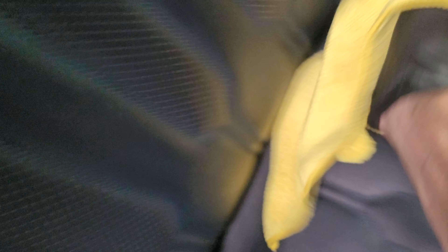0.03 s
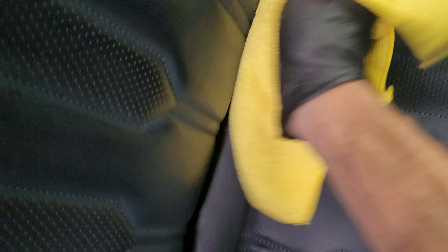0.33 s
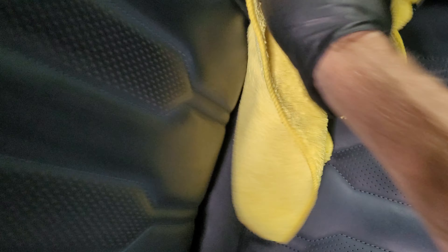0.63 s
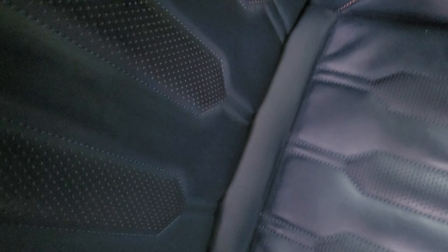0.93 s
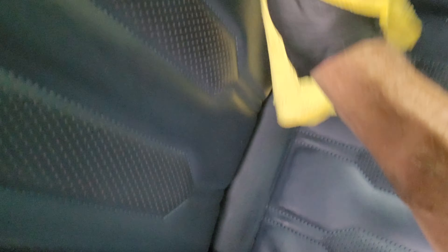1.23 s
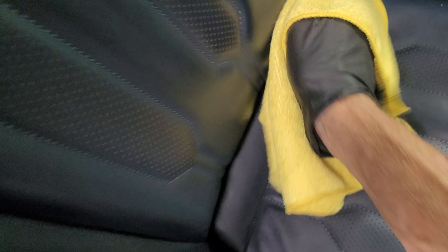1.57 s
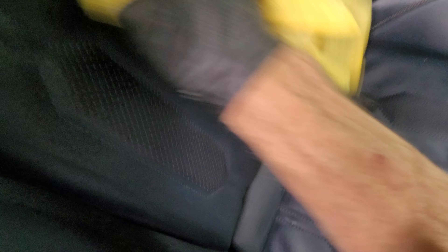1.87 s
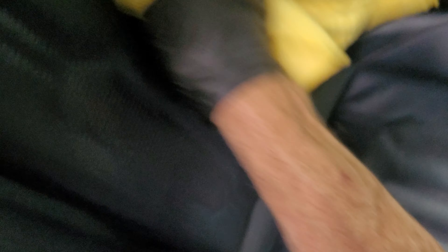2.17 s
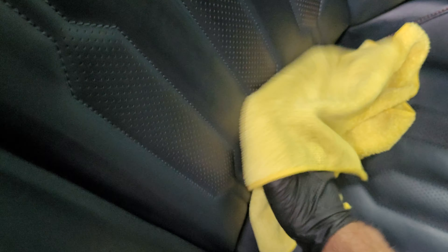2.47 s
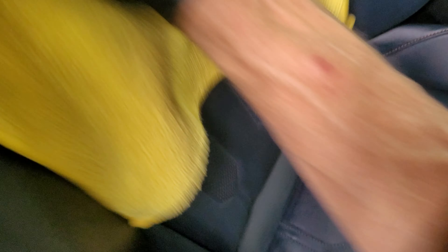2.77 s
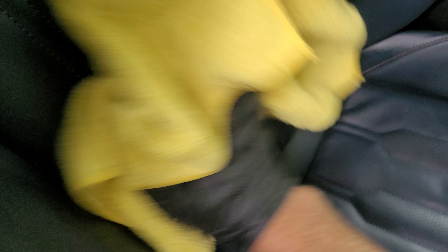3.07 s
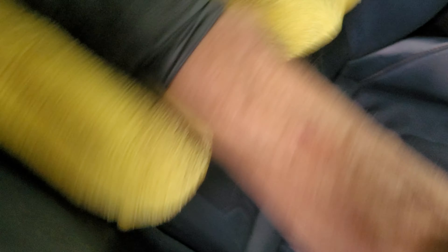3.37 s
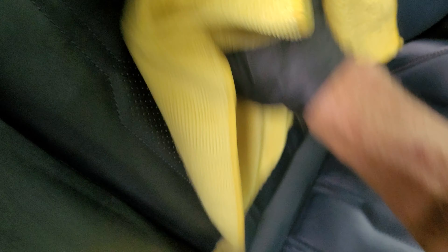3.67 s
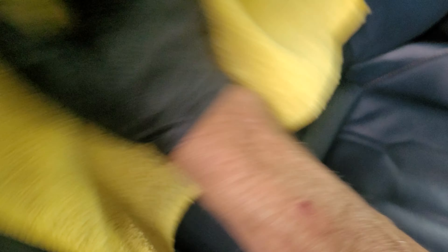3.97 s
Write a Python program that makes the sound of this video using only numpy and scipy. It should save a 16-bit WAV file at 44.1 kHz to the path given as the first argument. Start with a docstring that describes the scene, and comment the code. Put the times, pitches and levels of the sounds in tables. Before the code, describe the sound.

A cloth swishes back and forth over a leather car seat, close up, starting with faint squeaks and a soft thud at 0.3 seconds. Folds flap, clearly at 1.3 seconds. From 2 seconds the hissing strokes come with more dull cushion thuds and low juddering. The cloth snaps twice near 3 seconds, and rubbing continues to a strong flap at 3.9. A faint cabin rush lies beneath.

```python
"""A cloth is wiped back and forth over a leather car seat, close to the microphone.
Stick-slip friction of its fibres makes each stroke hiss, at times narrowing to a squeak or sizzle;
under pressure, coarser slips make the leather judder. The hand thuds into the damped cushion, folds
of cloth flap and twice snap, and the small cabin reflects the flaps and snaps briefly. Late on, the
air under the arm resonates. A faint steady rush lies beneath it all."""
import sys
import numpy as np
from scipy import signal
from scipy.fft import rfft, irfft
from scipy.io import wavfile

SR = 44100
rng = np.random.default_rng(int(sys.argv[2]) if len(sys.argv) > 2 else 0)


def generate_wav(signal):
    """Clip the signal to [-1, 1] and save it as 16-bit WAV at the path in sys.argv[1]."""
    frames = np.transpose(np.atleast_2d(signal))
    scaled = np.clip(frames, -1, 1) * 32767
    pcm = np.round(scaled).astype(np.int16)
    wavfile.write(sys.argv[1], SR, pcm)


N = 176400

def amp(db):
    return 10 ** (np.asarray(db) / 20)

def unit_rms(x):
    return x / np.sqrt(np.mean(x ** 2) + 1e-20)

def per_bin(points):
    """Interpolates a spectrum over log frequency at every bin."""
    hz, value = np.transpose(points)
    return np.interp(np.log(np.fft.rfftfreq(N, 1 / SR) + 1), np.log(hz), value)

def colour(x, spectrum):
    """Spectral shaping, scaled to rms 1."""
    return unit_rms(irfft(rfft(x) * amp(per_bin(spectrum)), N))

def pan(balance_db):
    """Constant-power panning; balance is the left level minus the right."""
    gains = amp(np.array([balance_db, -balance_db]).reshape(2, -1) / 2)
    return gains / np.sqrt(np.mean(gains ** 2, 0))

def add(mix, start_s, sound):
    part = mix[..., max(round(start_s * SR), 0):][..., :sound.shape[-1]]
    part += sound[..., :part.shape[-1]]

def wander(cutoff_hz):
    """Low-pass Gaussian noise of rms 1."""
    rolloff = 1 + (np.fft.rfftfreq(N, 1 / SR) / cutoff_hz) ** 4
    return unit_rms(irfft(rfft(rng.standard_normal(N)) / rolloff, N))

def slip_noise(per_s, spread_db, share):
    """Shot noise in two channels: random slips carry a share of the power, Gaussian noise the rest."""
    sizes = amp(spread_db * np.minimum(rng.exponential(1, N), 4))
    occurs = rng.random(N) < per_s / SR
    slips = unit_rms(sizes * occurs * rng.standard_normal((2, N)))
    return np.sqrt(share) * slips + np.sqrt(1 - share) * rng.standard_normal((2, N))

def mid_side(x, side_db):
    """Mid-side mixing makes two independent signals a partly coherent pair."""
    return unit_rms(x[0] + amp(side_db) * np.array([x[1], -x[1]]))

def cabin_echo(x, wet_db, t60_s, side_db):
    """Reverberation: reflections decay exponentially in the padded interior."""
    t = np.arange(SR // 4) / SR
    tail = mid_side(rng.standard_normal((2, len(t))), side_db) * amp(-60 * t / t60_s) * (t > .003)
    wet = signal.fftconvolve(np.atleast_2d(x), tail / np.linalg.norm(tail[0]), axes=1)
    return x + amp(wet_db) * wet[:, :N]

# Spectrum of the cabin's rush: frequency_hz, gain_db
CABIN_SPECTRUM = [(20, -9), (45, 6), (100, -1.5), (300, 3.5), (600, -8.5), (1400, -19.5), (3500, -22.5),
                  (15000, -42)]
def cabin_rush():
    """Stationary noise, strongest in the bass, fills the parked car."""
    return amp(-58) * colour(mid_side(rng.standard_normal((2, N)), side_db=-10), CABIN_SPECTRUM)

# Air resonances under the arm: centre_hz, half_width_hz, level_db, balance_db
CAVITY_MODES = [(630, 160, -54, -7.5), (1766, 190, -59, 4), (4345, 380, -62, 0)]
def arm_cavity(start_s=2.905, rise_s=0.028, fade_db_per_s=7.5):
    """Cavity resonance: rubbing excites the air in the gap between arm and seat."""
    out, t = 0, np.arange(N) / SR - start_s
    for hz, width_hz, db, balance_db in CAVITY_MODES:
        band = (wander(width_hz) + 1j * wander(width_hz)) * np.exp(2j * np.pi * hz * t)
        out = out + amp(db) * pan(balance_db) * band.real
    return out * np.clip(t / rise_s, 0, 1) * amp(-fade_db_per_s * t)

# Modes struck by a snap: frequency_hz, gain_db, t60_s, balance_db
SNAP_RING = [(377, 6, 0.01, 2.5), (612, 2, 0.022, -18), (1030, -1, 0.0055, 7), (1460, -8, 0.011, 1)]
# The cloth pulled taut: start_s, gain_db, cutoff_hz
CLOTH_SNAPS = [(2.8994, -26, 720), (2.988, -19, 1930)]
def snaps(rise_s=0.00021):
    """Impact excitation: taut cloth knocks the seat into damped modes; padding absorbs the treble."""
    out, t = np.zeros((2, N)), np.arange(SR // 10) / SR
    ring = sum(pan(balance_db) * amp(db - 60 * t / t60_s) * np.sin(2 * np.pi * hz * t)
               for hz, db, t60_s, balance_db in SNAP_RING)
    for start_s, db, cutoff_hz in CLOTH_SNAPS:
        padding = signal.butter(5, cutoff_hz, fs=SR, output="sos")
        add(out, start_s, amp(db) * signal.sosfilt(padding, ring * np.minimum(t / rise_s, 1)))
    return cabin_echo(out, wet_db=-13, t60_s=0.22, side_db=-2)

# Folds landing on the seat: time_s, peak_db, pitch_hz
FOLD_FLAPS = [(0.188, -38, 162), (0.227, -37.5, 262), (0.298, -31, 142), (0.971, -34, 330),
              (1.007, -36, 231), (1.131, -33.5, 226), (1.245, -33, 556), (1.32, -22, 246),
              (1.337, -32.5, 277), (1.348, -30, 173), (1.769, -33.5, 136), (1.889, -28.5, 310),
              (2.019, -28.5, 205), (2.199, -30.5, 135), (2.321, -30.5, 377), (2.363, -28.5, 370),
              (2.428, -21.5, 220), (2.454, -26, 200), (2.664, -31, 370), (2.727, -33, 314),
              (2.783, -26.5, 202), (3.488, -29, 258), (3.528, -29, 320), (3.735, -33, 410),
              (3.799, -32.5, 265), (3.9334, -19, 274)]
def flaps(decay_cycles=0.69):
    """Air displaced by each fold radiates one pulse, and the leather swings for a cycle or two."""
    out, t = np.zeros(N), np.arange(-SR // 50, SR // 20) / SR
    for time_s, db, hz in FOLD_FLAPS:
        u = np.pi * hz * t
        puff = (1 - 3 * u ** 2 + u) / (1 + u ** 2) ** 3  # the odd term skews the pulse
        swing = np.cos(2 * u) * np.exp(-np.where(t < 0, u ** 2, hz * t / decay_cycles))
        add(out, time_s + t[0], amp(db) * (puff + swing) / 2)
    return cabin_echo(out, wet_db=-3.5, t60_s=0.074, side_db=-6.5)

# Spectrum of the seat's shudder: frequency_hz, gain_db
SHUDDER_SPECTRUM = [(28, -39), (42, -2), (68, -12.5), (95, -17), (300, -56.5)]
# The hand pressing the cushion: start_s, peak_db, settled_pitch_hz, decay_s
CUSHION_THUDS = [(0.325, -28, 62.1, 0.037), (1.787, -38.5, 52.6, 0.022), (2.018, -31.5, 96.8, 0.036),
                 (2.191, -24.5, 65.4, 0.024), (2.452, -22, 59.7, 0.026), (2.719, -30, 50, 0.016),
                 (2.807, -34, 96.4, 0.02), (3.187, -31, 50.5, 0.025), (3.43, -32.5, 63.6, 0.023),
                 (3.476, -27, 57.5, 0.0093), (3.688, -26.5, 52.6, 0.049)]
def thuds(rise_s=0.0034, relax_s=0.013, shudder_db=-13, shudder_decay_s=0.091):
    """Damped oscillation of the cushion, its pitch sinking as the foam gives; the seat shudders on."""
    out, shake, t = np.zeros(N), np.zeros(N), np.arange(SR // 2) / SR
    wobble = 1 + 0.12 * wander(cutoff_hz=70)
    for start_s, db, hz, decay_s in CUSHION_THUDS:
        uneven = np.roll(wobble, -round(start_s * SR))[:len(t)]
        cycles = np.cumsum(hz * uneven * (1 + 0.49 * np.exp(-t / relax_s))) / SR
        rise = 1 - np.exp(-(t / rise_s) ** 2)
        envelope = rise * np.exp(-t / decay_s)
        add(out, start_s, amp(db) * uneven * envelope / envelope.max() * np.sin(2 * np.pi * cycles))
        add(shake, start_s, amp(db + shudder_db) * rise * np.exp(-t / shudder_decay_s))
    shudder = colour(mid_side(rng.standard_normal((2, N)), side_db=-5.5), SHUDDER_SPECTRUM)
    return out + shake * shudder

# Response of the padded leather: frequency_hz, gain_db
LEATHER_SPECTRUM = [(30, 5), (55, 8), (110, 5), (190, -1), (260, 2), (400, -2.5), (540, -14), (750, -17),
                    (1200, -29), (2500, -58)]
# Stereo placement of the judder: frequency_hz, balance_db
LEATHER_BALANCE = [(100, 1), (400, 1), (620, -28), (1000, 14)]
# Spells of juddering: start_s, length_s, level_db
JUDDER_SPELLS = [(0.282, 0.218, -51), (0.817, 0.196, -55.5), (1.471, 0.15, -50), (1.755, 0.23, -49),
                 (2.007, 0.046, -49), (2.173, 0.067, -40), (2.265, 0.22, -42.5), (2.571, 0.18, -49.5),
                 (2.892, 0.21, -45), (3.153, 0.17, -43), (3.428, .1, -40), (3.644, 0.11, -37),
                 (3.841, 0.14, -42.5)]
def judder(edge_s=0.038):
    """Coarse stick-slip friction shakes the padded leather while the hand bears down."""
    t = np.arange(N) / SR
    pressure = sum(amp(db) * np.clip(np.minimum(t - start_s, start_s + length_s - t) / edge_s + .5, 0, 1)
                   for start_s, length_s, db in JUDDER_SPELLS)
    slips = mid_side(slip_noise(per_s=520, spread_db=1.5, share=1.0), side_db=-15)
    vibration = colour(slips, LEATHER_SPECTRUM)
    return pressure * irfft(rfft(vibration) * pan(per_bin(LEATHER_BALANCE)), N)

def gliding_bands(rows, half_width_hz):
    """Random modulation spreads each swelling, gliding tone into a band of noise."""
    out = np.zeros(N)
    for start_s, length_s, first_hz, last_hz, db in rows:
        progress = np.arange(0, 1, 1 / (length_s * SR))
        blur = (wander(half_width_hz) + 1j * wander(half_width_hz))[:len(progress)]
        carrier = np.exp(2j * np.pi * np.cumsum(first_hz + (last_hz - first_hz) * progress) / SR)
        add(out, start_s, amp(db) * np.sin(np.pi * progress) * (blur * carrier).real)
    return out

# Half-formed squeaks of the leather: start_s, length_s, first_hz, last_hz, level_db
LEATHER_SQUEAKS = [(0, 0.13, 1690, 1520, -59.5), (.14, 0.15, 1434, 1163, -61.5),
                   (.14, 0.18, 3390, 3110, -66.5), (.256, 0.028, 1900, 2510, -62)]
# The cloth's pile dragged fast: start_s, length_s, first_hz, last_hz, level_db
PILE_SIZZLES = [(.68, .34, 1647, 3394, -53.5), (1.73, 0.17, 11470, 11700, -54),
                (2.5, 0.19, 10200, 11330, -52), (3.1, 0.33, 11400, 11950, -53.5)]
def squeaks_and_sizzles():
    """Partial synchronisation: slips fall loosely into step and give the friction a breathy pitch."""
    sizzle = np.array([gliding_bands(PILE_SIZZLES, half_width_hz=1400) for ear in "LR"])
    squeak = gliding_bands(LEATHER_SQUEAKS, half_width_hz=93)
    return squeak * pan(balance_db=5) + sizzle * pan(balance_db=8)

def shifting_folds(x, depth_db=1.93, patch_s=0.03, patch_hz=241):
    """Spectral modulation: moving folds raise and lower random patches of time and frequency."""
    hz, t, spectra = signal.stft(x, SR, nperseg=512)
    across, along = np.fft.fftfreq(len(hz), hz[1])[:, None], np.fft.fftfreq(len(t), t[1])
    smoothing = np.exp(-2 * np.pi * ((across * patch_hz) ** 2 + (along * patch_s) ** 2))
    patches = np.fft.ifft2(np.fft.fft2(rng.standard_normal(spectra.shape)) * smoothing).real
    return signal.istft(spectra * amp(depth_db * unit_rms(patches)), SR, nperseg=512)[1][:, :N]

# Spectra of the three friction bands: frequency_hz, gain_db
LOW_SPECTRUM = [(200, -16), (500, -3.5), (650, -2), (950, -5), (1500, 0), (1900, -2.5), (2600, -7.5),
                (4500, -25.5)]
HIGH_SPECTRUM = [(1400, -20), (2300, -2), (3200, 0.5), (4400, -1), (5600, -6.5), (7200, -15.5), (8400, -29),
                 (15000, -61)]
FIZZ_SPECTRUM = [(4000, -14), (6000, -6.5), (7300, -2.5), (8200, -7.5), (9200, -6), (10300, -2),
                 (11500, -2.5), (13500, -7), (15500, -5)]
# Stereo placement of the hiss: frequency_hz, balance_db
HISS_BALANCE = [(300, 1), (650, -4.5), (1000, 1.5), (1600, 5.5), (2500, 3), (4000, 5.5), (11000, 3.5),
                (15000, 2)]
# Faint rustle under the strokes, before each band's trim: time_s, level_db
RUSTLE_FLOOR = [(.6, -71), (1.6, -65.5), (2.1, -69), (2.5, -65.5), (2.9, -66), (3.4, -58.5)]
# Strokes, before each band's trim: start_s, length_s, crest_fraction, low_db, high_db, fizz_db, balance_db
STROKES = [(.02, 0.12, 0.4, -52.5, -56.5, -61.5, -3), (0.126, 0.18, 0.17, -59, -61, -64.5, -3.5),
           (0.257, 0.17, 0.6, -57, -59.5, -58.5, -4), (0.432, 0.089, 0.62, -59.5, -65.5, -66, -2),
           (0.665, 0.22, 0.74, -53, -53.5, -57.5, 1), (0.864, 0.15, 0.37, -54.5, -53, -59, 3),
           (1.101, 0.21, 0.62, -50, -52.5, -59, 1.5), (1.261, 0.11, 0.57, -45, -50.5, -55, 2),
           (1.359, 0.15, 0.28, -51, -53, -59.5, 0), (1.509, .13, 0.75, -52.5, -70, -79, 1),
           (1.67, 0.087, 0.49, -60.5, -55, -57.5, -1.5), (1.748, 0.21, 0.48, -53, -52, -51, 1),
           (1.91, 0.17, 0.83, -52, -50.5, -55, 4), (2.153, 0.15, 0.51, -50, -49, -53, 2.5),
           (2.251, 0.22, 0.45, -51, -48.5, -51.5, -0.5), (2.543, 0.22, 0.49, -58.5, -53, -51.5, 0.5),
           (2.694, 0.14, 0.21, -56.5, -52, -54, 2), (2.936, 0.23, 0.38, -49.5, -50, -53.5, 2),
           (3.085, 0.38, 0.29, -60.5, -54, -49.5, 1), (3.422, 0.16, 0.32, -49, -50, -52.5, 5.5),
           (3.576, 0.23, 0.31, -52.5, -53, -51.5, 5), (3.825, 0.15, 0.54, -51, -49, -54, 5)]
def cloth_strokes(rise_s=0.026, fall_s=0.04, sag_db=-5.5):
    """Friction noise: fibres catch and slip on the leather, louder as each stroke gains speed."""
    rustle_db = np.interp(np.arange(N) / SR, *np.transpose(RUSTLE_FLOOR))
    power = np.zeros((3, 2, N)) + amp(rustle_db) ** 2
    for start_s, length_s, crest, *band_db, balance_db in STROKES:
        t = np.arange(-rise_s, length_s + fall_s, 1 / SR)
        contact = np.clip(np.minimum(t / rise_s, (length_s - t) / fall_s) + .5, 0, 1)
        speed = amp(np.interp(t / length_s, [0, crest, 1], [sag_db, 0, sag_db]))
        add(power, start_s + t[0], contact * (amp(band_db)[:, None, None] * pan(balance_db) * speed) ** 2)
    grip, hiss = wander(cutoff_hz=42), 0
    bands = [(LOW_SPECTRUM, -1.5, 1.1), (HIGH_SPECTRUM, -3.5, .7), (FIZZ_SPECTRUM, -2, .7)]
    for envelope, (spectrum, trim_db, flicker_db) in zip(np.sqrt(power), bands):
        slips = slip_noise(per_s=3000, spread_db=1, share=0.26)
        hiss = hiss + colour(slips, spectrum) * envelope * amp(trim_db + flicker_db * grip)
    return np.sqrt(2) * irfft(rfft(shifting_folds(hiss)) * pan(per_bin(HISS_BALANCE)), N)

def scene():
    """Superposition: the sound pressures of all sources add."""
    rubbing = cloth_strokes() + squeaks_and_sizzles() + arm_cavity() + judder()
    return rubbing + thuds() + flaps() + snaps() + cabin_rush()

def record(dry, low_hz=28, high_hz=15780):
    """Band limiting: the microphone sheds the deepest bass, and a steep low-pass cuts the top treble."""
    thin = signal.sosfilt(signal.butter(2, low_hz, "high", fs=SR, output="sos"), dry)
    low_pass = signal.firwin(801, high_hz, window=("kaiser", 9), fs=SR)
    return signal.oaconvolve(thin, low_pass[None], "same")

dry = scene()
out = record(dry)
generate_wav(out)
```